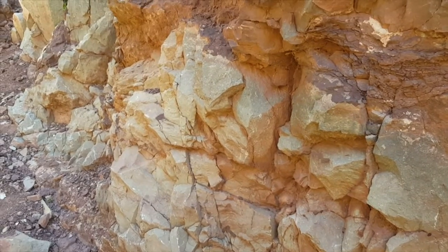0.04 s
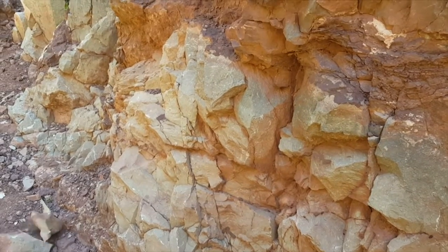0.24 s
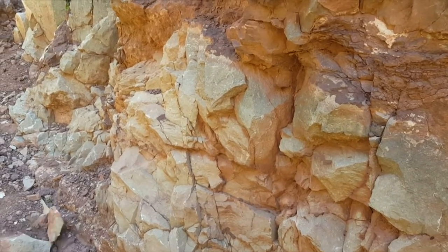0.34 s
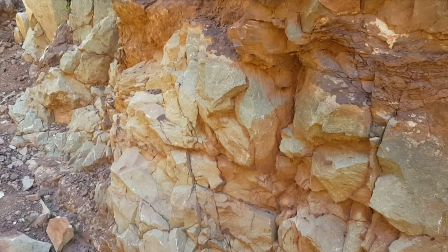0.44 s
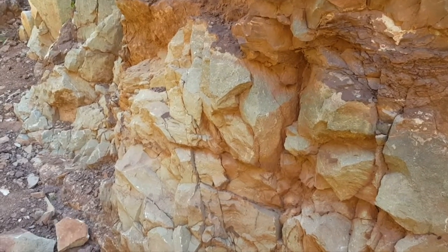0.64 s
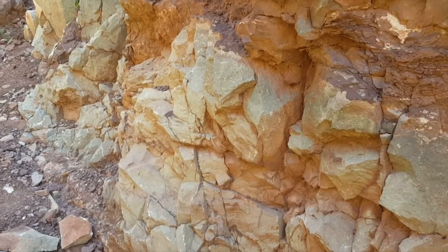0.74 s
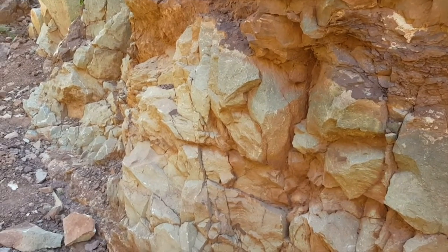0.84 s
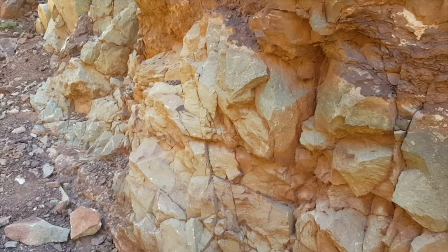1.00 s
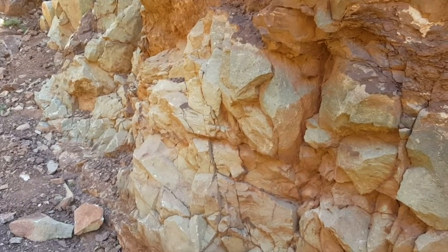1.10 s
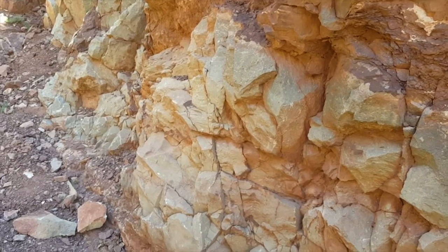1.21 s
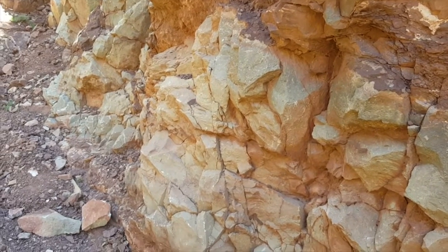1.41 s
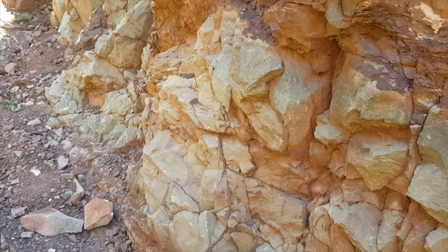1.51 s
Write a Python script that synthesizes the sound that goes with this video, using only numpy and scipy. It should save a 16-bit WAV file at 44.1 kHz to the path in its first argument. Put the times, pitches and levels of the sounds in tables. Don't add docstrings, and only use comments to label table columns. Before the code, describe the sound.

Stone hits stone in two quick hard cracks, followed by dull knocks and a trickle of pebbles.

```python
import sys
import numpy as np
from scipy import signal
from scipy.io import wavfile

SR = 44100
rng = np.random.default_rng(int(sys.argv[2]) if len(sys.argv) > 2 else 0)


def linear_from_db(decibels):
    return 10 ** (np.asarray(decibels, float) / 20)


def to_wav(sig):
    pcm = np.clip(np.atleast_2d(sig), -1, 1) * 32767
    pcm = np.round(pcm).astype(np.int16)
    wavfile.write(sys.argv[1], SR, pcm.T)


N = 68355

# (frequency [Hz], density [dB per Hz])
WATER_SPECTRUM = [(25, -10), (80, -8.5), (210, -2), (700, -9.5), (3000, -6.5), (4200, -17), (8500, -27),
                  (13200, -27)]
# (frequency [Hz], left-right likeness [-1 to 1])
WATER_LIKENESS = [(60, 0.57), (240, 1), (950, 0.84), (3770, -0.04), (15000, -0.05)]
# (frequency [Hz], left minus right [dB])
WATER_LEAN = [(60, -1.5), (180, 6.5), (550, 0.5), (1650, 8.5), (4970, 4.5), (15000, 0)]
# (time [s], level [dB])
TRICKLE_FLOW = [
    (.2, -89.5),
    (.222, -37),
    (.245, -40.5),
    (.272, -37),
    (.305, -50),
    (.45, -59.5),
    (.56, -60),
    (.68, -69),
    (.8, -89.5),
]
# (frequency [Hz], level [dB])
PEBBLE_SPECTRUM = [(140, -10.5), (300, -8), (800, -7.5), (1900, 0.5), (4200, -17.5), (9500, -35.5),
                   (12500, -27.5), (15500, -32)]
# (time [s], ground thud [dB], stone
# # clack [dB], grit [dB])
CONTACTS = [(0.1999, -18.5, -6.5, -12.5), (.204, -23.5, -18.5, -30), (0.2123, -26, -4, -5.5),
            (.216, -38, -15, -15.5), (.2218, -42, -12.5, -31), (.23, -34, -24, -37),
            (0.2718, -55, -30.5, -34), (0.3259, -47, -35, -55), (.3402, -62, -46, -36),
            (0.35, -27, -37.5, -29), (0.387, -45.5, -43, -81), (0.412, -59, -42, -45.5),
            (.438, -68, -46, -49), (0.4513, -49.5, -37, -41), (0.463, -33, -27, -53),
            (0.492, -53, -37.5, -58), (0.5119, -49, -35, -49.5), (.534, -52, -48.5, -73),
            (0.551, -53, -55, -68), (.562, -60, -65, -52), (0.617, -42.5, -41, -49.5),
            (.7165, -86.5, -72.5, -56), (.843, -79.5, -64, -59.5), (1.06, -60, -55, -73),
            (1.138, -54, -51.5, -76), (1.174, -58.5, -51, -78), (1.324, -66, -57.5, -79),
            (1.485, -67, -66, -77)]
# (frequency [Hz], level [dB], t60 [s])
BED_MODES = [(180, -27, 0.012), (250, -12, 0.015), (319.5, 2, .035), (431.7, -10.5, 0.032),
             (550, -6, 0.0087)]
# (frequency [Hz], level [dB], t60 [s])
KNOCK_MODES = [(474, -7, 0.014), (554, -5.5, 0.033), (763, -3.5, 0.029), (993, 0.5, 0.012),
               (1293, -1, 0.023), (1610, -9.5, 0.016), (1944, -4, .012), (2770, -10, 0.012)]
# (frequency [Hz], level [dB], t60 [s])
CHIP_MODES = [(3120, -0.5, 0.0086), (4300, -7, 0.011), (4830, -5, 0.008), (6090, -5, 0.0041),
              (6800, -7.5, 0.0078), (8860, -18.5, 0.0016), (9500, -23.5, .004), (11730, -12, 0.0099),
              (13250, -21, 0.00355), (14540, -15.5, 0.003)]
# (frequency [Hz], level [dB], t60 [s])
STONE_MODES = [(817, -9.5, 0.026), (976, -14, 0.012), (1126, -10, 0.027), (1263, -14, .018),
               (1380, -16, .015), (1630, -14.5, .015), (1900, -5.5, .015), (2064, -6, 0.012),
               (2110, -5.5, 0.033), (2470, -8, .015), (3020, 1.5, 0.0056), (2757, -6, .018),
               (1750, 1.5, .006)]
# (frequency [Hz], level [dB], t60 [s])
EDGE_MODES = [(3300, -8.5, .008), (3660, -8.5, .012), (4194, -6.5, 0.018), (4680, -9, .008),
              (5430, -13.5, 0.0083), (6300, -19, .005), (7280, -21.5, .006), (8820, -29, .005),
              (9370, -34, 0.0017), (12340, -14.5, .009), (12600, -32, 0.0037), (13200, -18, 0.0036),
              (14100, -15, 0.0046), (15000, -20, .004)]
PORT_OFFSET = [
    [-.00041],
    [-.00036],
]

WATER_DB = -69.5
TRICKLE_PER_S, PEBBLE_CYCLES, PEBBLE_LEAN_DB, PEBBLE_ALIKE_HZ = 6000, 12, 3, 600
BLOWS_END_S = .25
STRIKE_SPREAD_DB = 3
HARD_TILT_DB, HARD_AT_DB = 0.31, -11
HEAVY_TILT_DB, HEAVY_AT_DB = 0.8, 7.5
CRUNCH_PER_S, CRUNCH_T60_S = 2500, .035
RIGHT_LAG_S, RIGHT_CRUNCH_DB = .00024, 7.5
LOW_CUT_HZ = 140
TOP = 1.6


def at_hz(points, hz):
    table = np.array(points)
    return np.interp(np.log(hz), np.log(table[:, 0]), table[:, 1])


def rms_one(x):
    return x / np.sqrt(np.mean(x ** 2) + 1e-20)


def filtered(kind, order, hz, x):
    return signal.sosfilt(signal.butter(order, hz, kind, fs=SR, output="sos"), x)


def drift(rate):
    r = np.exp(-80 * np.pi * rate / SR)
    slow = signal.lfilter([1], [1, -2 * r, r * r], rng.standard_normal(N // 40 + 2002))[2000:]
    return np.interp(np.arange(N) / 40, np.arange(len(slow)), rms_one(slow))


def water(patchy_db):
    out, together = 0, drift(3.0)
    edges = 22 * 2 ** np.arange(0, 9.7, 1 / 3)
    white = rng.standard_normal((2, 2, N + 8000))
    for k, (low, high) in enumerate(zip(edges, edges[1:])):
        mid, side = filtered("band", 2, [low, high], white[k % 2])[:, 8000:]
        hz = np.sqrt(low * high)
        alike = np.clip(at_hz(WATER_LIKENESS, hz), -1, 1)
        lean_db = at_hz(WATER_LEAN, hz)
        gain = linear_from_db(at_hz(WATER_SPECTRUM, hz) + patchy_db * (0.2 * together + drift(4.7)))
        band = np.sqrt(1 + alike) * mid + np.sqrt(1 - alike) * side * [[1], [-1]]
        out = out + gain * linear_from_db([[lean_db / 2], [-lean_db / 2]]) * band
    return linear_from_db(WATER_DB + 2.5) * rms_one(out)


def ring(clicks, hz, t60):
    r, w = linear_from_db(-60 / (max(t60, .002) * SR)), 2 * np.pi * hz / SR
    return signal.lfilter([0, np.sin(w)], [1, -2 * r * np.cos(w), r * r], clicks + 1e-18)


def grains(per_s, size_db):
    sizes = linear_from_db(size_db * np.minimum(rng.exponential(1, (2, N)), 4))
    sizes = sizes * rng.choice([-1, 1], (2, N))
    return rms_one(sizes * (rng.random((2, N)) < per_s / SR)) * np.sqrt(1000 / SR)


def trickle():
    out = 0
    for hz in 140 * 2 ** np.arange(0, 6.9, .3):
        ticks = grains(TRICKLE_PER_S * np.sqrt(hz / 2000) / 4, 3.5)
        alike = 1 / (1 + (hz / PEBBLE_ALIKE_HZ) ** 2)
        ticks[1] = np.sqrt(alike) * ticks[0] + np.sqrt(1 - alike) * ticks[1]
        t60 = PEBBLE_CYCLES / hz
        rung = ring(ring(ticks, hz, t60), hz, t60)
        out = out + linear_from_db(at_hz(PEBBLE_SPECTRUM, hz)) * np.sqrt(hz) * rms_one(np.diff(rung, prepend=0))
    flow = linear_from_db(np.interp(np.arange(N) / SR, *np.transpose(TRICKLE_FLOW)))
    return flow * rms_one(out) * linear_from_db([[PEBBLE_LEAN_DB / 2], [-PEBBLE_LEAN_DB / 2]])


def struck(modes, hit_db, tilt_db, crunch_db, right_db, scatter, pivot_hz=1500, crunch_t60=CRUNCH_T60_S):
    left = (np.array(CONTACTS)[:, 0] * SR).astype(int)
    right = left + int(RIGHT_LAG_S * SR)
    fade = linear_from_db(-60 / (crunch_t60 * SR))
    spread_db = STRIKE_SPREAD_DB * rng.standard_normal((len(left), 30))
    out = 0
    for k, (hz, level_db, t60) in enumerate(modes):
        clicks = np.zeros((2, N))
        size = linear_from_db(hit_db + level_db + tilt_db * np.log2(hz / pivot_hz) + spread_db[:, k])
        clicks[0, left] = size
        clicks[1, right] = size * linear_from_db(right_db + scatter * spread_db[:, k + 15])
        crunch = signal.lfilter([1], [1, -fade], clicks) * linear_from_db([[crunch_db], [crunch_db + RIGHT_CRUNCH_DB]])
        out = out + ring(crunch * grains(CRUNCH_PER_S * 2, 3.0) - clicks * (-1) ** k, hz, t60)
    return out


def phases_db():
    is_blow = np.transpose(CONTACTS)[0] < BLOWS_END_S
    return np.where(is_blow, 0, -200), np.where(is_blow, -200, 0)


def thud():
    _, thud_db, _, _ = np.transpose(CONTACTS)
    shaken = struck(BED_MODES, thud_db, 0, crunch_db=-21, right_db=-1.5, scatter=0.28)
    return filtered("low", 2, 1000, shaken)


def knock():
    _, thud_db, clack_db, _ = np.transpose(CONTACTS)
    _, tumble_db = phases_db()
    tilt_db = np.clip(HEAVY_TILT_DB * (clack_db - thud_db - HEAVY_AT_DB), -8, 4)
    return struck(KNOCK_MODES, clack_db - 2.8 + tumble_db, tilt_db, crunch_db=-12.5, right_db=-7.5,
                  scatter=0.43, pivot_hz=1100, crunch_t60=0.046)


def clack():
    _, _, clack_db, grit_db = np.transpose(CONTACTS)
    blow_db, _ = phases_db()
    tilt_db = HARD_TILT_DB * (grit_db - clack_db - HARD_AT_DB)
    return struck(STONE_MODES, clack_db - 1 + blow_db, tilt_db, crunch_db=-11, right_db=-10.5, scatter=0.68)


def grit():
    _, _, _, grit_db = np.transpose(CONTACTS)
    blow_db, tumble_db = phases_db()
    edges = struck(EDGE_MODES, grit_db - 5 + blow_db, 0, crunch_db=-4.5, right_db=-7.5, scatter=.7)
    chips = struck(CHIP_MODES, grit_db - 6 + tumble_db, 0, crunch_db=-1.8, right_db=-7.5,
                   scatter=0.49, crunch_t60=0.0333)
    return filtered("high", 2, 2800, edges + chips)


def stone():
    body = filtered("band", 3, [400, 3900], clack() + knock())
    return thud() + body + grit()


def scene():
    near = filtered("high", 4, LOW_CUT_HZ, stone() + trickle())
    return water(patchy_db=1.66) + near


def roll_off(x):
    return signal.sosfilt(signal.butter(12, 16530, fs=SR, output="sos"), x)


def record(dry):
    rounded = TOP * np.tanh(dry / TOP)
    limited = signal.sosfilt(signal.cheby2(10, 50, 16850, fs=SR, output="sos"), rounded)
    return roll_off(limited + np.array(PORT_OFFSET))


dry = scene()
out = record(dry)
to_wav(out)
```